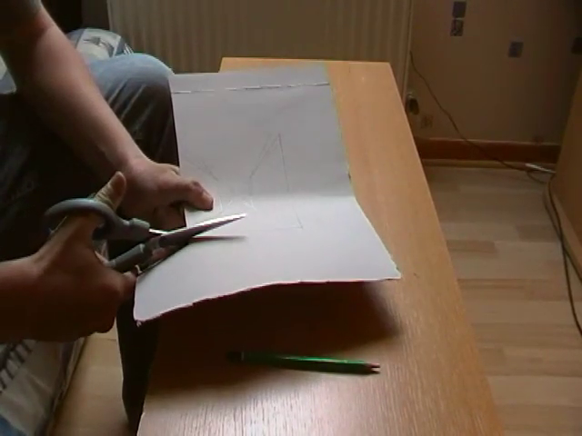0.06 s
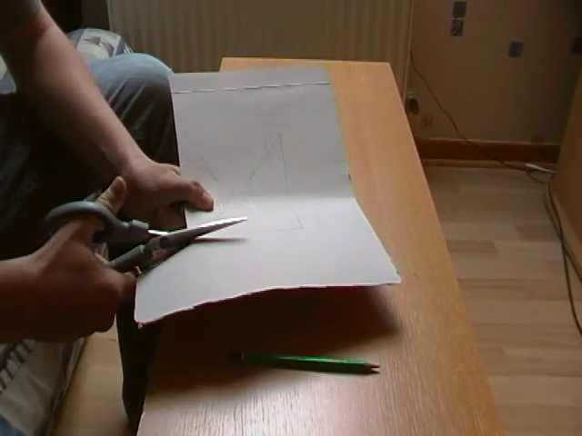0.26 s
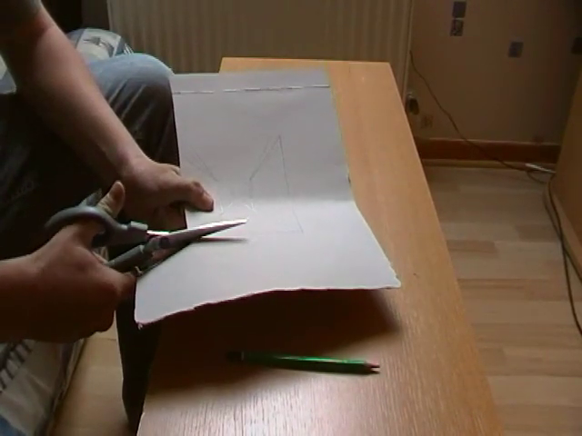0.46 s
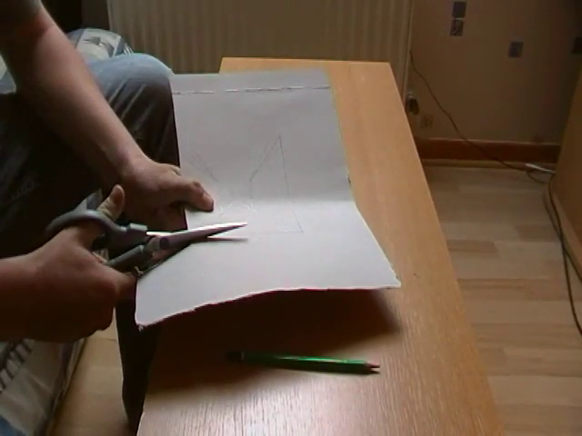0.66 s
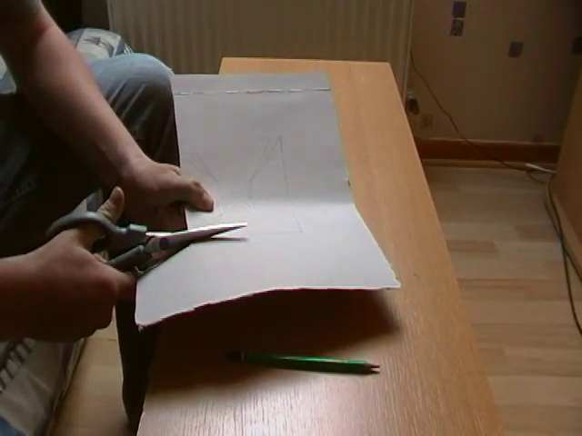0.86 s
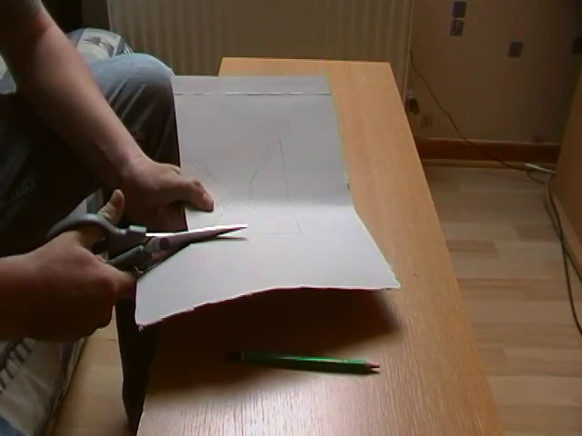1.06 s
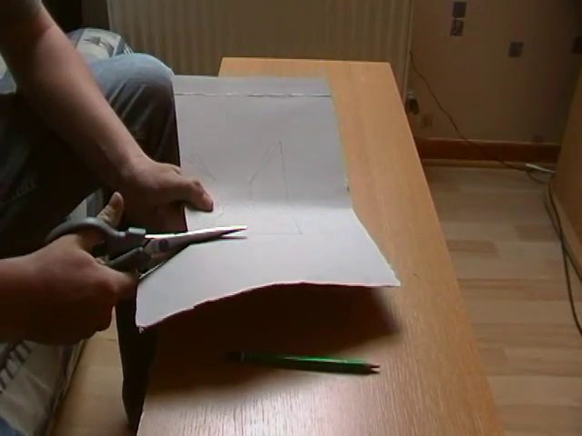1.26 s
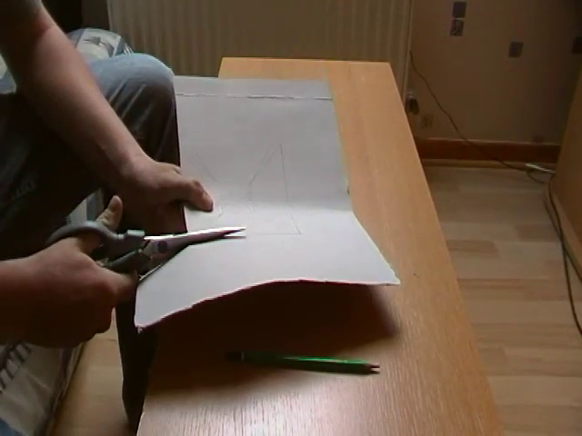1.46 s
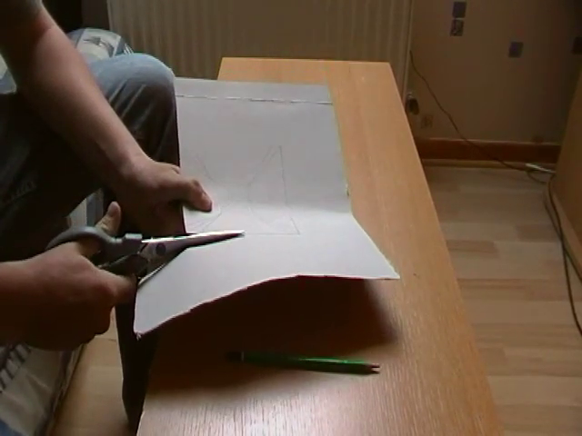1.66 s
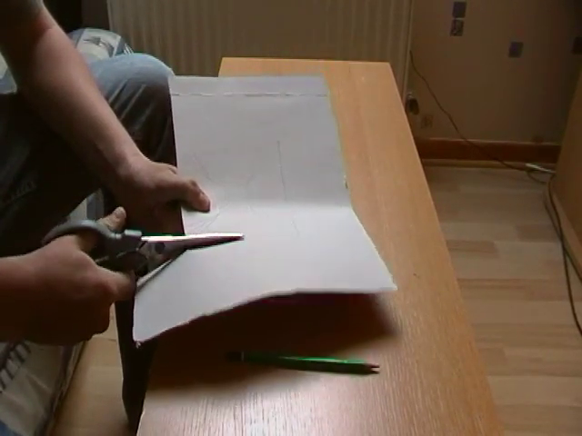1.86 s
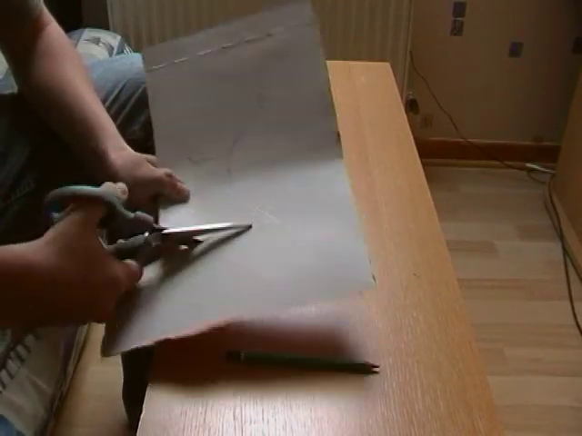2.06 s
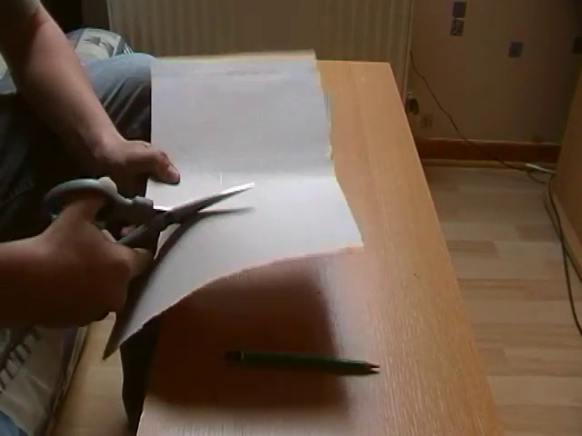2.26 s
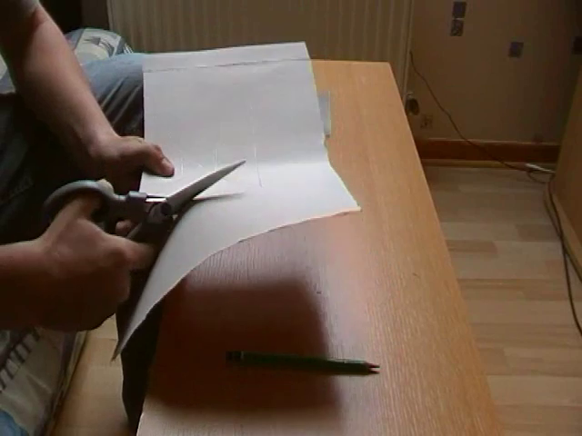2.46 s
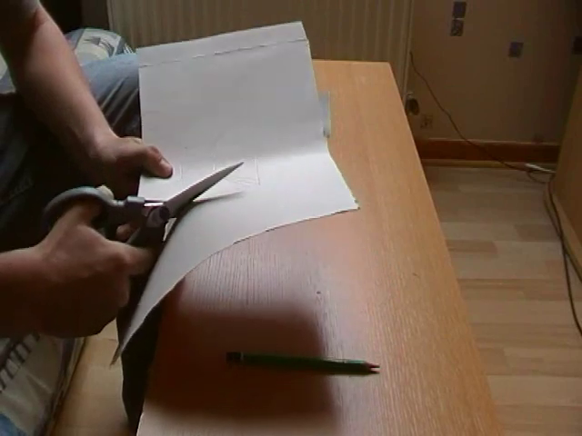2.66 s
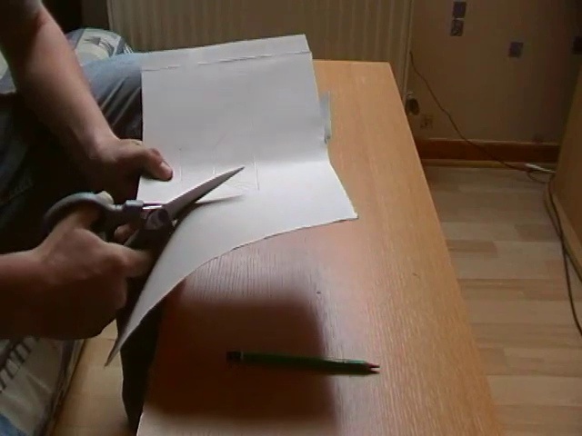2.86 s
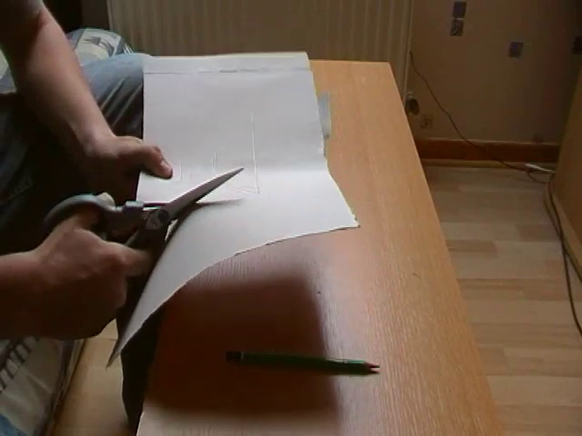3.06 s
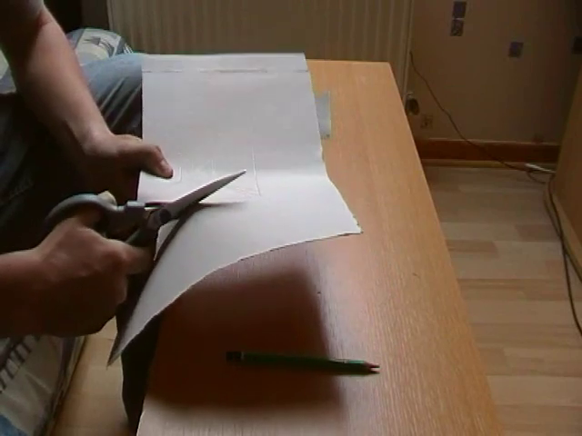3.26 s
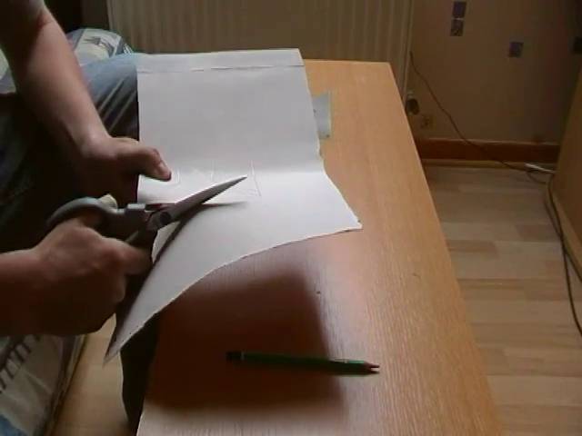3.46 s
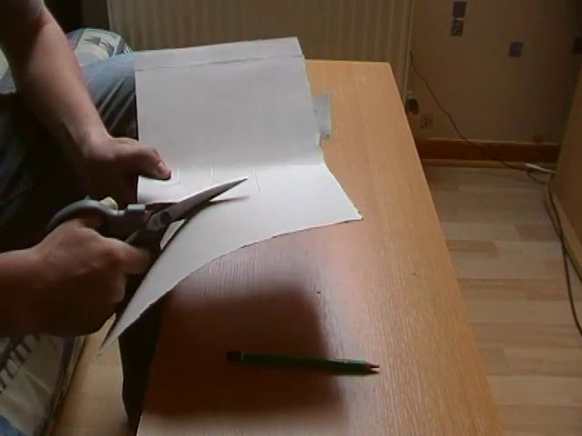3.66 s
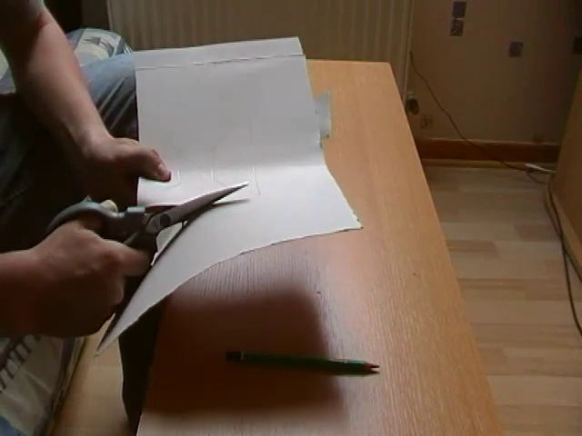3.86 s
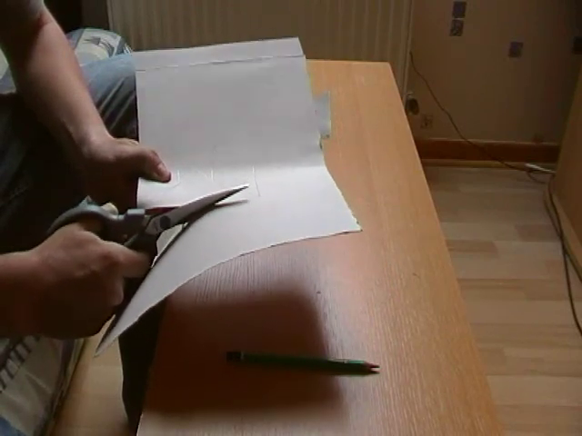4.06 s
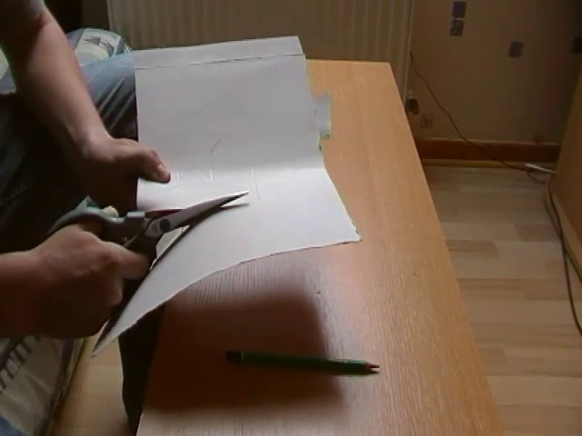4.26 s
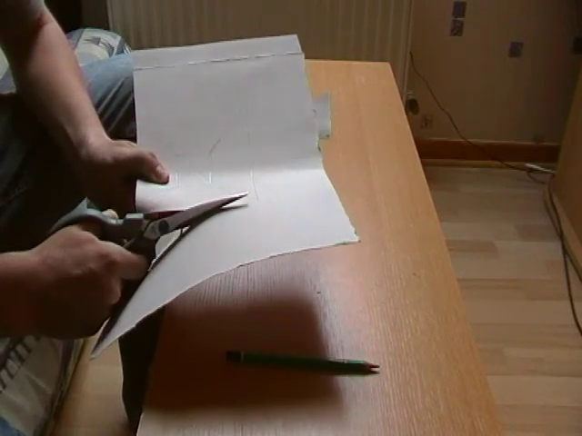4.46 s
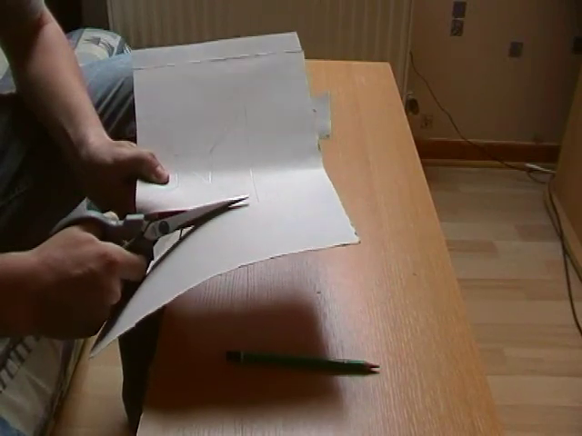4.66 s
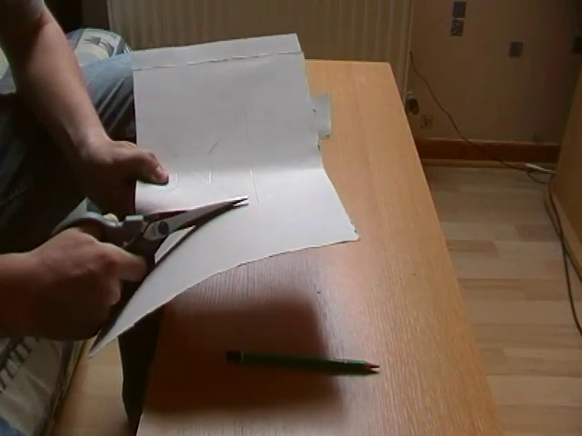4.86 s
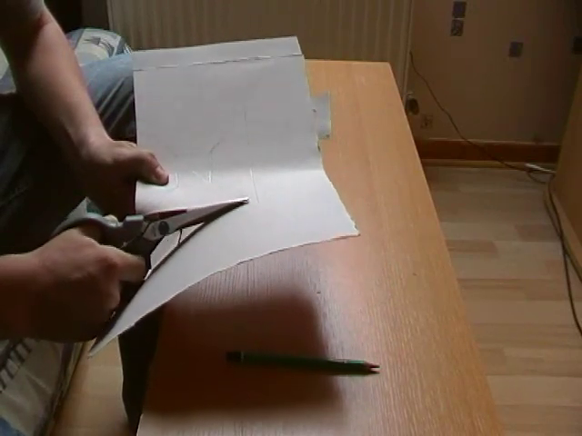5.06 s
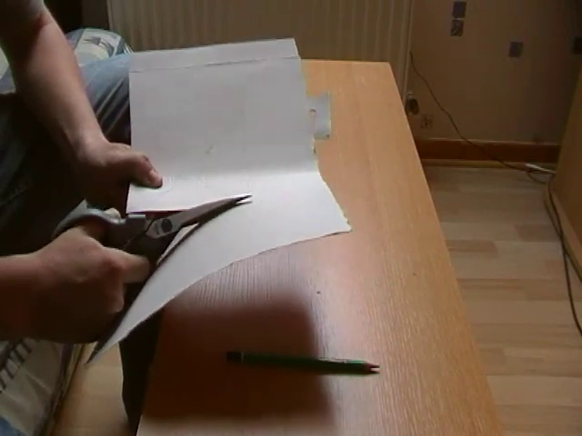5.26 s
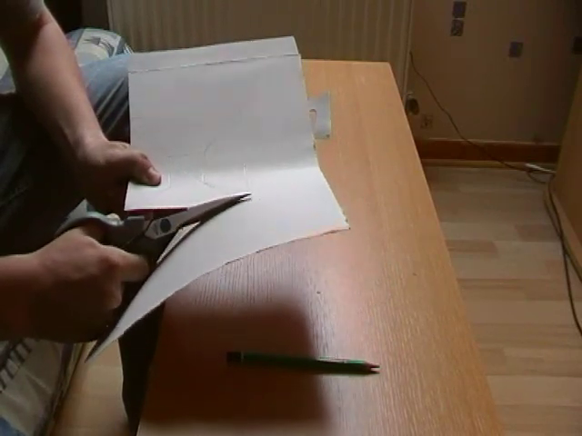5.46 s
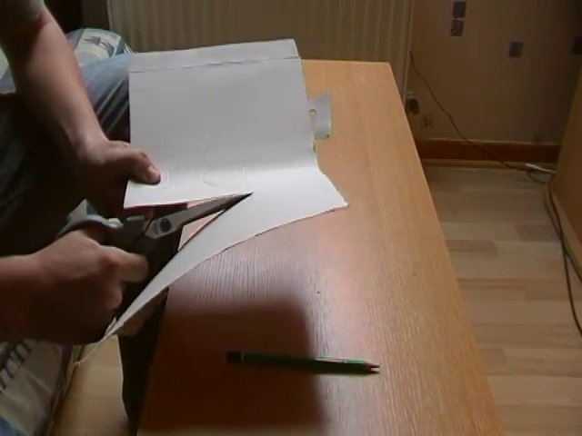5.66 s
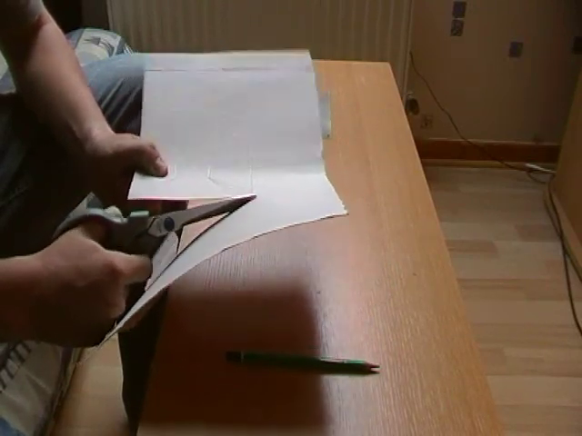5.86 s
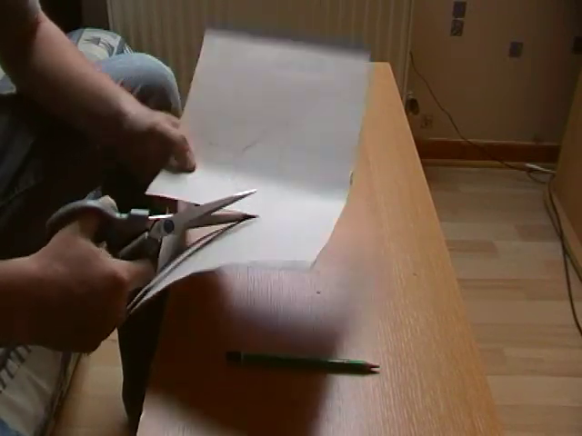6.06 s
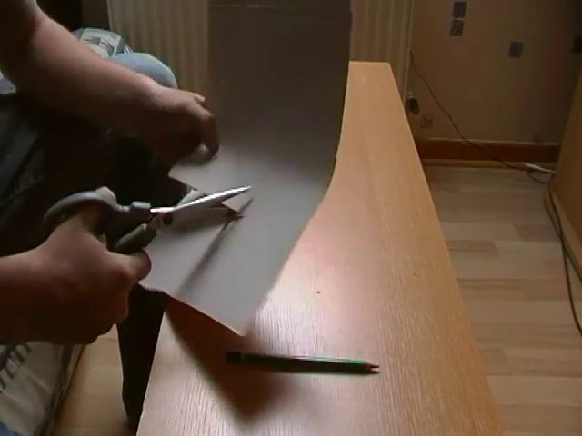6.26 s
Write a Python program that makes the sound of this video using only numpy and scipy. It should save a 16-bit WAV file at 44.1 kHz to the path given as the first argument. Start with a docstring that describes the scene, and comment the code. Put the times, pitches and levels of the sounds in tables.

```python
"""Scissors work through a stiff sheet of paper held over a table, in a small room.
The cut advances in jerks: each is a burst of random fibre snaps that rings the paper; one hard snap shuts the blades.
The sheet also rustles: dense, clumped snaps pass through the colours of rubbing and bending paper.
Two microphone ports hear it directly and from the walls, over steady hiss and a faint tone."""
import sys
import numpy as np
from scipy import signal
from scipy.fft import rfft, irfft
from scipy.io import wavfile
from scipy.ndimage import uniform_filter1d

SR = 44100
rng = np.random.default_rng(int(sys.argv[2]) if len(sys.argv) > 2 else 0)


def bounce(signal):
    """Save signal as a 16-bit WAV file at the path given by the first command-line argument."""
    frames = np.transpose(np.atleast_2d(signal))
    limited = np.clip(frames, -1, 1)
    pcm = np.round(limited * 32767).astype(np.int16)
    wavfile.write(sys.argv[1], SR, pcm)


N = 277830


def gain_of(db):
    """Turn decibels into an amplitude factor."""
    return 10 ** (np.asarray(db) / 20)


def evened(x):
    """Scale a signal to rms 1."""
    return x / np.sqrt(np.mean(x ** 2) + 1e-20)


def read(points, hz):
    """Read a curve at any pitch, with straight lines over log frequency."""
    f, value = np.transpose(points)
    return np.interp(np.log(hz + 1), np.log(f + 1), value)


def add(mix, s, sound):
    """Add a sound into the mix at a time in seconds."""
    part = mix[round(s * SR):][:len(sound)]
    part += sound[:len(part)]


def colour(points):
    """Impulse response of energy 1 with the given spectrum; it starts at once, with no ringing before."""
    hz = abs(np.fft.fftfreq(4096, 1 / SR))
    log_gain = np.log(gain_of(np.maximum(read(points, hz), -100)))
    minimum_phase = np.exp(np.conj(signal.hilbert(log_gain)))
    taps = np.fft.ifft(minimum_phase).real[:2048]
    return taps / np.linalg.norm(taps)


def mode(hz, width):
    """Sine that swells quickly and dies, of energy 1; the soft start keeps it out of the bass."""
    t = np.arange(2048) / SR
    taps = t * np.exp(-1.5 * np.pi * width * t) * np.sin(2 * np.pi * hz * t)
    return taps / np.linalg.norm(taps)


def fibres(size, per_s, spread_db):
    """Random snaps of either sign, a few much larger than the rest; rms 1."""
    chance, big, sign = rng.random((size, 3)).T
    happens = chance < per_s / SR
    height = gain_of(-spread_db * np.log(big + 0.0084))
    return evened(happens * height * np.sign(sign - .5))


def clumps(size):
    """Slowly wandering random curve of rms 1 that bunches the snaps; size is the smoothing in samples."""
    smooth = uniform_filter1d(rng.standard_normal(N), size)
    return evened(uniform_filter1d(smooth, size))


# Colour of the hiss. Each row: pitch in Hz, relative level in dB per Hz.
HISS = [(12, -35), (20, -1), (103, -5), (208, -5.5), (280, -3.5), (348, -8.5), (521, -9), (739, -10.5),
        (3720, -16.5), (8570, -18.5), (12500, -20.5), (16200, -65), (22000, -120)]
# How alike the hiss is in the two ports. Each row: pitch in Hz, left-right likeness (1 is identical).
HISS_LIKENESS = [(60, 0.2), (230, 0.044), (870, 0.33), (3310, 0.086), (12600, 0.046)]


def hiss():
    """Steady noise of room and microphone, nearly unrelated in the two ports."""
    frames, hz = N // 512 + 5, np.fft.rfftfreq(2048, 1 / SR)
    a, b, c, d = rng.standard_normal((frames, 1025, 4)).T
    same = np.clip(read(HISS_LIKENESS, hz), -1, 1)[:, None]
    left, other = a + 1j * b, c + 1j * d
    right = same * left + np.sqrt(1 - same ** 2) * other
    spectra = np.array([left, right]) * gain_of(read(HISS, hz))[:, None]
    noise = signal.istft(spectra, nperseg=2048, noverlap=1536)[1][:, :N]
    return gain_of(-60.0) * evened(noise)


# A faint thin tone comes and goes. Each row: time in seconds, pitch in Hz, rms level in dB.
TONE = [(3.9, 511, -82), (4.464, 510.4, -65), (4.59, 504, -76), (4.866, 521, -67), (5.162, 514, -63),
        (5.3, 510.8, -84)]


def tone():
    """A faint sine whose pitch and level glide from row to row."""
    s, hz, db = np.transpose(TONE)
    t = np.arange(N) / SR
    fade = np.clip(np.minimum(t - s[0], s[-1] - t) / .1, 0, 1)  # 0.1 s at either end
    phase = 2 * np.pi * np.cumsum(np.interp(t, s, hz)) / SR
    return np.sqrt(2) * fade * gain_of(np.interp(t, s, db)) * np.sin(phase)


# How fast the echoes die. Each row: pitch in Hz, seconds to fall by 60 dB.
ROOM_DECAY = [(150, 0.4), (600, 0.26), (2000, 0.26), (6000, 0.24), (12000, 0.23)]
# Colour of the sound thrown back by the walls. Each row: pitch in Hz, relative level in dB.
WALLS = [(150, -11), (700, -8.5), (2000, -9.5), (4500, -7), (7000, -12), (12000, -16)]


def tail():
    """Sparse taps of random sign, each band dying at its own speed; the bass is alike in both ports."""
    taps = np.zeros((2, SR // 2))
    at = np.arange(120, SR // 2 - 20, 20)
    at = at + rng.integers(0, 20, (2, len(at)))
    np.put_along_axis(taps, at, rng.choice([-1., 1.], at.shape), 1)
    hz, t, z = signal.stft(taps, SR, nperseg=256)
    same = np.clip(.9 - hz / 3500., 0, 1)[:, None]
    z = np.array([z[0], same * z[0] + np.sqrt(1 - same ** 2) * z[1]])
    decay = gain_of(-60 * t / read(ROOM_DECAY, hz)[:, None])
    echoes = signal.istft(z * decay, SR, nperseg=256)[1]
    walls = colour(WALLS) * gain_of(-8.5)
    return signal.fftconvolve(echoes / np.linalg.norm(echoes[0]), walls[None], axes=1)


def room(x):
    """Echoes from the walls: three random tails fade in and out by turns, so their fine colour keeps changing."""
    turn = 2 * np.pi * 2.3 * np.arange(N) / SR  # 2.3 turns per second
    shares = [np.sqrt(2 / 3) * np.cos(turn + k * np.pi / 3) for k in range(3)]
    return sum(signal.fftconvolve((x * share)[None], tail(), axes=1)[:, :N] for share in shares)


# Timing between the ports. Each row: pitch in Hz, radians by which the left port leads.
LEAD = [(0, 0), (1300, 0), (2800, -.4), (4900, .2), (6100, 2.3), (7800, 2.3), (8500, 1.6), (12500, 1.6)]
# Balance between the ports. Each row: pitch in Hz, left minus right in dB.
TILT = [(60, 0.5), (130, 0.0), (280, 0.5), (590, 0.0), (1270, 0.5), (2730, 1.5), (5870, -1.0), (12600, 0.5)]


def ports(x):
    """The direct sound reaches the two ports with a phase and level difference that depends on pitch."""
    hz = np.fft.rfftfreq(N, 1 / SR)
    half = gain_of(read(TILT, hz) / 2) * np.exp(.5j * read(LEAD, hz))  # each port takes half
    return irfft(rfft(x) * np.array([half, 1 / half]), N)


# How the held sheet answers. Each row: time in seconds, whole-sheet ring in relative dB,
# flap in dB relative to force, bend pitch in Hz, fizz in dB relative to tear.
HOLD = [(0.3, -8, -20, 820, -2), (1., -3, -8, 914, 1), (1.9, -20, -15, 887, 2), (2.199, -12, -29, 885, 0),
        (3.001, -4.5, -37, 890, 3), (3.5, -13, -10.5, 940, 4), (4.1, -29, -22, 984, 2),
        (4.4, -23, -16, 990, 3), (4.8, -12.5, -18, 750, 2), (5.1, -10, -24, 1060, -1),
        (5.4, -18.5, -31, 925, 0), (5.74, -18, -29, 1130, -3), (5.79, -28, -40, 857, 6),
        (6.3, -28, -7, 840, 2)]


def held(s):
    """Whole-sheet ring dB, flap dB, bend pitch and fizz dB at a time, gliding between rows."""
    times, *columns = np.transpose(HOLD)
    return [np.interp(s, times, c) for c in columns]


# Ringing pitches of the held sheet. Each row: pitch in Hz, nominal width in Hz (wider dies sooner),
# relative level in dB before wider ones are raised.
SHEET = [(824, 32, 7), (1150, 56, -4), (1728, 62, 4.5), (1950, 52, 6), (3720, 140, -12)]


def sheet():
    """Response of the whole sheet: all its modes ring together, with alternating sign; energy 1."""
    taps = 0
    for k, (hz, width, db) in enumerate(SHEET):
        taps = taps + (-1) ** k * gain_of(db) * np.sqrt(width) * mode(hz, width)
    return taps / np.linalg.norm(taps)


# Colour of rubbing paper. Each row: pitch in Hz, relative level in dB per Hz.
RUB = [(59, -42), (100, -21), (191, -5), (503, -11.5), (568, -10.5), (834, -1.5), (1000, -3.5), (1250, -3),
       (4500, -15), (10200, -20.5), (11800, -17), (12500, -67), (16200, -107), (22000, -120)]


def creases(level):
    """Small patches of the sheet buckle in clumps, each patch at its own pitch."""
    out = np.zeros(N)
    for hz in np.geomspace(550., 4200., num=7):
        pops = evened(fibres(size=N, per_s=700., spread_db=3.5) * gain_of(3.2 * clumps(size=500)))
        ringing = signal.oaconvolve(pops * level, mode(hz, 0.35 * hz)[:512])[:N]
        out += gain_of(read(RUB, hz)) * np.sqrt(hz / 1000) * ringing
    return out


# Brightest hiss of parting or sliding fibres. Each row: pitch in Hz, relative level in dB.
FIZZ = [(4000, -53), (6200, 6), (9000, 1.5), (12500, 1)]
# The sheet slides, bends and rubs on the blades, one group of rows for each spell of movement.
# Each row: time in seconds, relative level in dB, treble in dB relative to its usual share.
RUSTLE = [
    [(0.3, -69, 0), (0.386, -59, 0), (0.566, -58.5, 0), (0.79, -61.5, 0), (0.936, -69, 0), (1.0, -68, 0)],
    [(2.09, -52, -11), (2.106, -58, -11), (2.166, -43, -11), (2.174, -37, -11), (2.224, -41, -11),
     (2.26, -33, -11), (2.28, -39, -11), (2.316, -38, -11), (2.434, -55, -11), (2.498, -58, -11),
     (2.52, -64, -11)],
    [(2.53, -64.5, 0), (2.668, -68, 0), (2.944, -62.5, 0), (3.15, -70, 0)],
    [(3.43, -60, 0), (3.692, -65, 5), (3.814, -63, 3), (3.95, -69.5, 0)],
    [(5.34, -62, 0), (5.5, -63, 0)],
    [(5.93, -60, 6), (5.944, -64, 6), (6.042, -54, 6), (6.052, -52, 6), (6.142, -41, 6), (6.156, -47, 6),
     (6.198, -44, 6), (6.208, -51, 6), (6.3, -47, 6)],
]


def rustle():
    """Dense clumped snaps under the hand's movement, coloured by the sheet as it bends."""
    t = np.arange(N) / SR
    s, level_db, treble_db = np.transpose(np.concatenate(RUSTLE))
    moving = 0
    for rows in RUSTLE:  # 20 ms fades at the ends of each spell
        moving = moving + np.clip(np.minimum(t - rows[0][0], rows[-1][0] + 0.013 - t) / 0.02, 0, 1)
    level = np.minimum(moving, 1) * gain_of(np.interp(t, s, level_db))
    drive = level * evened(fibres(size=N, per_s=7000., spread_db=2.8) * gain_of(2.2 * clumps(size=300)))
    rub = gain_of(-3.) * signal.oaconvolve(drive, colour(RUB))[:N]
    buckling = gain_of(-7.5) * creases(level)
    modes = signal.oaconvolve(drive * gain_of(held(t)[0] + 4.0), sheet())[:N]
    treble = signal.oaconvolve(drive * gain_of(np.interp(t, s, treble_db) - 15.0), colour(FIZZ))[:N]
    return rub + buckling + modes + treble


# Colour of the closing snap. Each row: pitch in Hz, relative level in dB.
SNAP = [(300, -12), (1000, 6), (2500, -3), (5000, -16), (9000, 6), (12500, -26)]


def snap():
    """The blade tips snap shut through the last fibres: one hard crack and two quick rebounds."""
    out = np.zeros(N)
    for late, db in [(0, -1.5), (.0007, -4), (.0016, -10)]:  # seconds after the crack, dB
        add(out, 5.7888 + late, gain_of(db) * colour(SNAP))
    return out


def jerk(row, snaps, scatter, whole, tear, fizz, flap):
    """Fibres part in a quick burst; the paper near the blades rings at its own two pitches."""
    s, force_db, fall, edge_hz, bend_db, tear_db = row
    modes_db, flap_db, bend_hz, fizz_db = held(s)
    t = np.arange(len(snaps)) / SR
    rise = .005 + .00004 * (-30 - force_db)  # seconds; weak jerks start more slowly
    build_up = np.sin(np.pi / 2 * np.minimum(t / rise, 1)) ** 2
    stroke = build_up * np.exp(-(np.maximum(t - rise, 0) / fall) ** 1.02)
    brief = stroke ** 1.3  # high noises stop sooner
    slow = stroke * np.sqrt(t / 0.0091)  # wide bending builds up later
    bend = mode(bend_hz * (1 + 0.071 * scatter), 302.0)  # its pitch varies from jerk to jerk
    edge = mode(edge_hz, 700.0)
    parts = [(bend_db, bend, slow), (-3, edge, stroke), (modes_db, whole, stroke),
             (tear_db + 2.5, tear, brief), (flap_db, flap, slow), (tear_db + fizz_db, fizz, brief)]
    out = 0
    for db, taps, shape in parts:  # before its dB, every part carries the energy of its stroke
        sound = signal.fftconvolve(snaps * shape, taps)
        out = out + gain_of(db) * sound * np.linalg.norm(shape) / np.linalg.norm(sound)
    return s - .0025, gain_of(force_db - 6.5) * out  # the build-up begins 2.5 ms early


# Colour of tearing fibres. Each row: pitch in Hz, relative level in dB.
TEAR = [(1500, -44), (2800, 6), (4800, 7.5), (6200, -0.5), (8000, -63)]
# Low colour of the flapping sheet. Each row: pitch in Hz, relative level in dB.
FLAP = [(130, -30), (170, -10), (195, 1), (235, -5), (350, -1), (520, -3), (800, -20)]
# The jerks of the blades. Each row: time in seconds, force in relative dB, fall time in seconds,
# edge ring in Hz, bend ring in dB relative to force, tear in relative dB above or below force.
JERKS = [(.331, -49.5, 0.0055, 1620, -8, -3), (0.373, -48, 0.011, 1750, -7, -7),
         (0.398, -41, 0.0069, 1640, -9.5, -11), (.444, -45, .008, 1760, -8, -5.5),
         (.479, -45, 0.0099, 1730, -5, -3), (0.501, -39, 0.013, 1630, -4.5, -10),
         (.534, -46, 0.0048, 1730, -9, -8), (.594, -44, 0.0079, 1700, -9, -14),
         (.616, -45, .006, 1950, -4, -4.5), (.656, -39, .008, 1660, -16, -4.5),
         (.681, -42, 0.0062, 1750, 1, -11), (0.721, -43.5, 0.0066, 1740, -13, -10),
         (.772, -45, .007, 1760, 4.5, -11), (0.809, -49, .007, 1980, -6, -18),
         (.86, -40, 0.0068, 1960, 3.5, -5), (0.874, -48, 0.0055, 1730, -12, -6),
         (.913, -40, 0.01, 1720, -2.5, -7.5), (1.096, -40.5, 0.0096, 1660, -10, -10.5),
         (1.151, -31.5, 0.011, 1690, -4.5, -15.5), (1.211, -38.5, 0.012, 1790, -7, -11),
         (1.262, -46, 0.01, 1810, -15, -11), (1.286, -35.5, 0.014, 1320, -19, -11),
         (1.35, -35.5, 0.015, 1930, -11, -7), (1.47, -50.5, 0.0097, 1440, -4, -6),
         (1.597, -34.5, .009, 1520, -7.5, -17), (1.667, -24.5, 0.0068, 1770, -3.5, -14),
         (1.735, -16.5, 0.0065, 1710, -37, -17.5), (1.791, -21, 0.0072, 1820, -1, -14.5),
         (1.828, -17.5, 0.0056, 1600, -7.5, -9.5), (2.062, -39, 0.013, 1730, -2, -4.5),
         (2.546, -48.5, .011, 1570, -4, -24), (2.644, -47.5, .012, 1980, 0.5, -12),
         (2.722, -48, .007, 1380, 4, -13), (2.839, -51, .009, 1690, -22, -14),
         (2.894, -38.5, 0.011, 1660, -7, -13), (2.924, -37, 0.0082, 1660, -18, -13.5),
         (2.959, -36.5, 0.0052, 1600, 1, -8), (3.034, -43.5, .015, 1820, 0.5, -5.5),
         (3.089, -45.5, 0.012, 1850, -5, -15), (3.463, -38.5, 0.014, 1780, -6.5, -11.5),
         (3.517, -37, 0.0089, 1910, -3.5, -12.5), (3.562, -38.5, 0.012, 1760, -4, -10.5),
         (3.59, -45.5, 0.0056, 2080, -2, -8), (3.7, -40, 0.0047, 1960, -5, -12),
         (3.75, -39, 0.0097, 1860, -2.5, -11), (3.793, -38, 0.0087, 1610, -2.5, -11.5),
         (3.823, -44, .008, 1870, -6, -9), (3.868, -36, 0.0069, 1700, -7, -10.5),
         (4.012, -39.5, .01, 1650, -10, -14), (4.066, -36, 0.0064, 1710, -3.5, -11.5),
         (4.134, -47.5, 0.0063, 1560, -5, -15), (4.267, -35.5, 0.0066, 1580, -5, -14.5),
         (4.313, -32, .015, 1590, -8, -13), (4.406, -34, .007, 1660, -14, -14.5),
         (4.437, -40.5, 0.0095, 1830, 0, -10), (4.493, -46.5, .009, 1300, -16, -17),
         (4.555, -49.5, .008, 1420, -19, -9), (4.627, -38, .007, 1600, -23, -16),
         (4.718, -30, 0.0094, 1520, -7, -15.5), (4.766, -46, 0.013, 1480, -19, -15),
         (4.811, -23.5, 0.0068, 1610, -16, -18.5), (4.858, -32.5, 0.0098, 1850, -9, -19),
         (4.954, -25.5, 0.0077, 1830, -14, -16), (5.087, -19.5, 0.0071, 1540, -31, -15.5),
         (5.137, -15, 0.0074, 1630, -28, -17.5), (5.361, -40.5, 0.018, 2370, -1, -10),
         (5.377, -23.5, 0.014, 1220, -10, -13.5), (5.391, -20, 0.013, 1890, -4, -16),
         (5.645, -28, .008, 2100, -13, -18), (5.67, -24, 0.013, 1710, -9, -10),
         (5.719, -18.5, 0.0083, 1370, -11, -16.5), (5.757, -19.5, 0.01, 2380, -2.5, -10.5),
         (5.787, -12.5, 0.0078, 1670, -4, -4.5), (5.97, -54, 0.0081, 1460, -14, -25),
         (6.017, -47, .011, 1350, -25, -24), (6.085, -37, 0.023, 1900, -5.5, -12.5)]


def cutting():
    """All jerks of the blades, each with fresh random snaps."""
    out = np.zeros(N)
    parts = sheet(), colour(TEAR), colour(FIZZ), colour(FLAP)
    for row in JERKS:
        snaps = fibres(size=2048, per_s=4100.0, spread_db=3.5)
        add(out, *jerk(row, snaps, rng.uniform(-0.85, 1), *parts))
    return out


def scene():
    """Paper sounds, direct and from the walls, over the tone and hiss."""
    thin = signal.butter(4, 160., "highpass", fs=SR, output="sos")  # a thin sheet radiates no deep bass
    paper = signal.sosfilt(thin, cutting() + rustle() + snap())
    return ports(paper) + room(paper) + tone() + hiss()


def record(dry):
    """The band limit of the recorder: a steep low-pass at 12020 Hz."""
    low_pass = signal.firwin(511, 12020, window=("kaiser", 9), fs=SR)
    return signal.oaconvolve(dry, low_pass[None], "same")


dry = scene()
out = record(dry)
bounce(out)
```